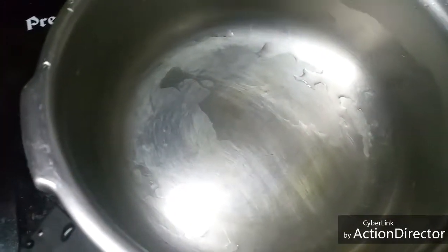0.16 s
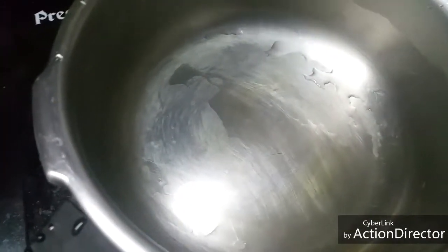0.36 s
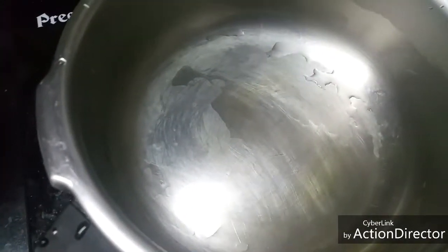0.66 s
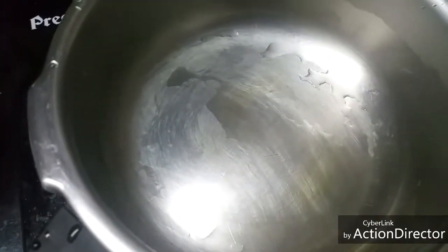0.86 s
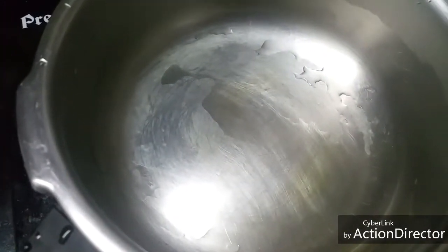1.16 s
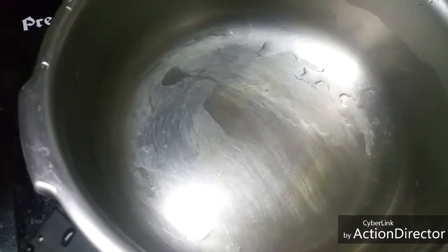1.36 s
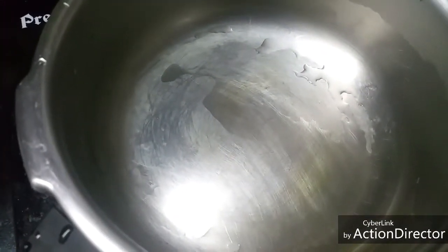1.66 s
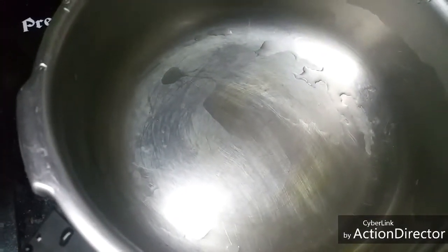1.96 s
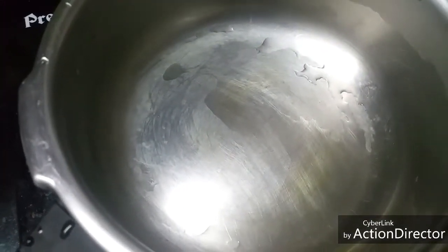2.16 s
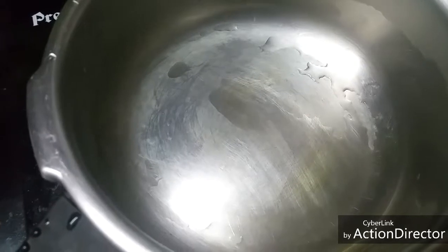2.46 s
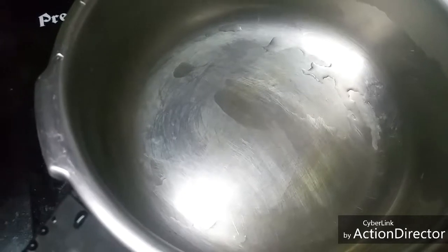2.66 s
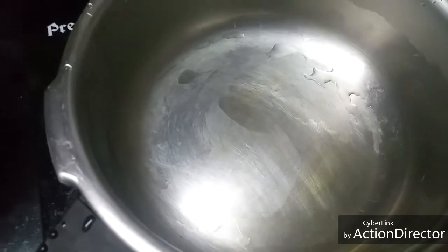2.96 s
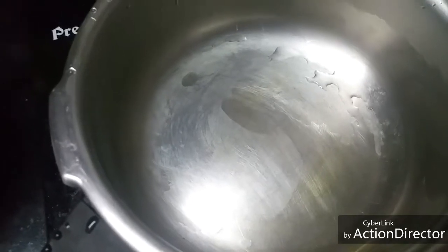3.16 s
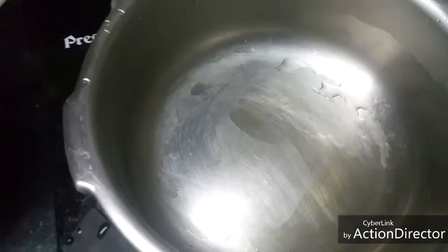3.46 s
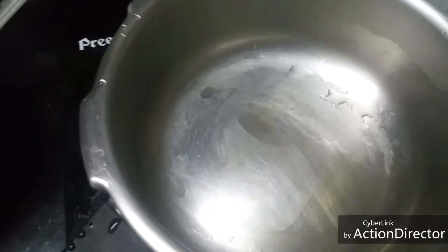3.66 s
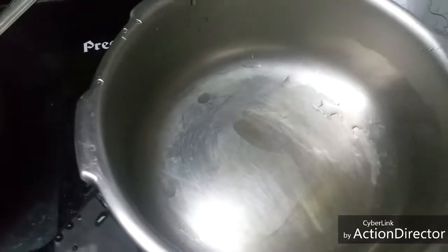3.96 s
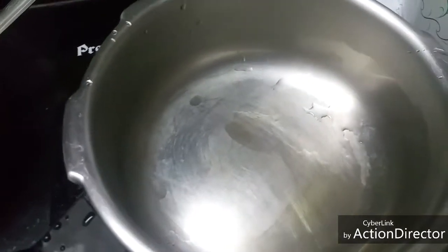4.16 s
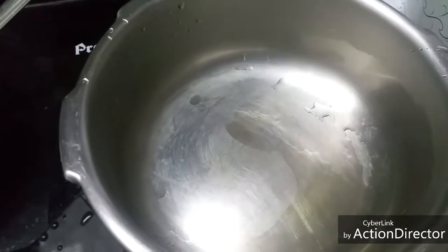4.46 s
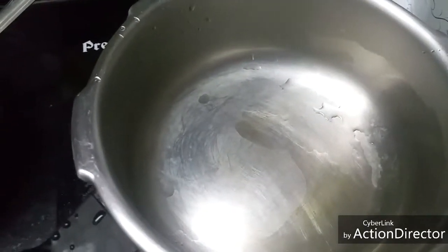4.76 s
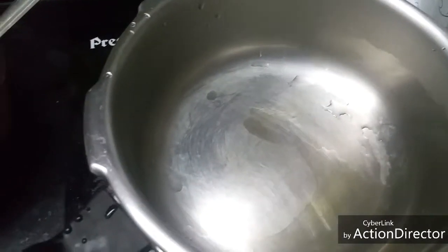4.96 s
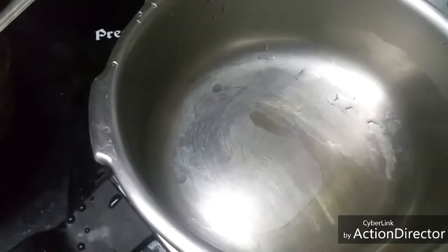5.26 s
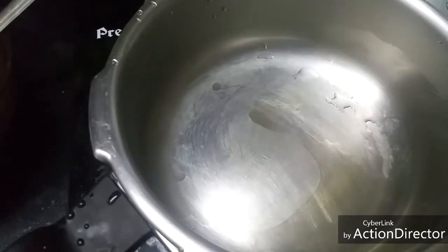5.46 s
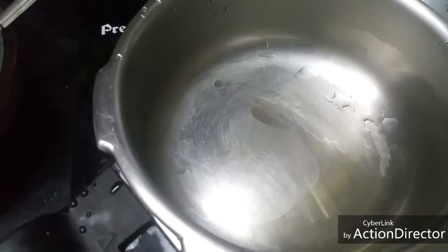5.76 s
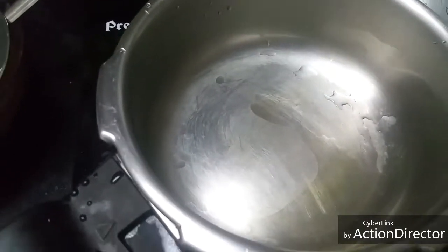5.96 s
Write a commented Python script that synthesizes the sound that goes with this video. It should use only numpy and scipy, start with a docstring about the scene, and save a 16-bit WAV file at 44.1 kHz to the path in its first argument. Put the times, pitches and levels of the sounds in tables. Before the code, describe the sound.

Close up in a small kitchen, an induction cooktop hums low while its cooling fan rushes and a wet steel pot base buzzes with thin, gliding high whines. A faint ting comes early, a softer clink with squeaky sliding around two seconds, then faint ticks. Near the end, bright steel clinks burst out with scraping, squeaks and a dull knock on the worktop.

```python
"""Steel pot on a humming induction cooktop

An induction cooktop heats a wet steel pot in a small kitchen.
Two sine tones make the coil hum: the lower swells and sinks, the upper stays nearly level.
Coloured noise and wavering tones make the cooling fan; mains-timed noise rings in the pot base
for a high buzz and gliding whines. Steelware is clinked, slid and made to squeak: dying tones
and noise, and short fluttering tones. Soft low bumps, faint ticks and two late knocks come too."""
import sys
import numpy as np
from scipy import signal
from scipy.fft import rfft, irfft, next_fast_len
from scipy.io import wavfile

SR = 44100
rng = np.random.default_rng(int(sys.argv[2]) if len(sys.argv) > 2 else 0)


def dump(signal):
    """Clip the signal to [-1, 1] and save it as 16-bit WAV at the path in sys.argv[1]."""
    limited = np.clip(np.atleast_2d(signal).T, -1, 1)
    pcm = np.round(limited * 32767).astype(np.int16)
    wavfile.write(sys.argv[1], SR, pcm)


N = 269098
T = np.arange(N) / SR
RING_T = T[:SR // 2]  # the half second given to each short sound
SIZE = next_fast_len(N, True)
FREQS = np.maximum(np.arange(SIZE // 2 + 1) * SR / SIZE, 1)
MAINS_HZ = 49.955
CUTOFF_HZ = 15100

# Many weak, crowded modes of the steelware, as a spectrum shape: pitch_hz, level_db [dB per Hz]
CROWDED_MODES = [(500, -24), (1700, -18), (2300, 0), (2850, -7), (3150, -4), (3700, 2), (4200, -14),
                 (4850, -1), (5450, -18), (6150, 0), (6600, -6), (7650, 5), (8000, -2), (8450, 7),
                 (9150, -18), (11800, -2), (15000, -11)]


def from_db(db):
    """Turn decibels into a plain gain."""
    return 10 ** (np.asarray(db) / 20)


def rms_one(x):
    """Scale a sound to an rms (average strength) of 1."""
    return x / np.sqrt(np.mean(x ** 2) + 1e-20)


def in_time(rows):
    """Join the points of each column with straight lines, giving a value at every sample."""
    s, *columns = np.transpose(rows)
    return [np.interp(T, s, column) for column in columns]


def over_hz(points):
    """Join the points of a short spectrum on a log pitch scale, giving a value at every frequency."""
    hz, value = np.transpose(points)
    return np.interp(np.log(FREQS), np.log(hz), value)


def bell(hz, width):
    """Height of a resonance at every frequency: 1 on top, falling away on both sides."""
    return 1 / np.hypot(1, 2 * (FREQS - hz) / width)


def filtered(x, gain):
    """Filter a sound by giving each frequency its own gain."""
    return irfft(rfft(x, SIZE) * gain, SIZE)[..., :N]


def colour(x, gain):
    """Filter by a gain per frequency, then scale to rms 1."""
    return rms_one(filtered(x, gain))


def pan(db):
    """Left and right gains for a level difference; positive is louder on the left."""
    return from_db(np.array([[.5], [-.5]]) * db)


def drift(rate_hz):
    """Smooth random curve with spread 1, made by dulling noise above a slow rate."""
    return colour(rng.standard_normal(N), 1 / (1 + (FREQS / rate_hz) ** 2) ** 2)


def waver(t, rate_hz):
    """Random line with spread near 1 that heads for a new value at the given rate."""
    knots = np.arange(0, 1, 1 / rate_hz)
    return np.interp(t - t[0], knots, rng.standard_normal(len(knots)))


def dying_noise(spectrum, t60, ragged=False):
    """Dense stereo ring from rms 1, falling 60 dB in t60 seconds; a ragged one has peaks and gaps."""
    cluster_hz, cluster_db = 70, 4.5
    hz, db = np.transpose(spectrum)
    bins = np.maximum(np.fft.rfftfreq(len(RING_T), 1 / SR), 1)
    gain = from_db(np.interp(np.log(bins), np.log(hz), db))
    if ragged:
        # waver runs along frequency here, with a new value every cluster_hz
        gain = gain * from_db(cluster_db * waver(bins / SR, SR / cluster_hz))
    noise = rng.standard_normal((2, len(RING_T)))
    steady = rms_one(irfft(rfft(noise) * gain, len(RING_T)))
    return steady * from_db(-60 * RING_T / t60)


def clicks(rows):
    """One single-sample push for each start_s and level_db."""
    out = np.zeros(N)
    for s, db in rows:
        out[round(s * SR)] += from_db(db)
    return out


def excite(force, response):
    """Every push of a force sets off the body's ring, and the rings add up (convolution)."""
    return signal.fftconvolve(np.atleast_2d(force), response, axes=1)[:, :N]


def add(out, s, sound):
    """Mix a short sound in at a time in seconds."""
    start = round(s * SR)
    out[:, start:start + sound.shape[-1]] += sound[..., :N - start]


def hum():
    """The coil pulls on the pot twice per mains cycle; this tone swells and sinks, its octave hardly."""
    # Peak level of the lower hum tone: time_s, level_db
    low_points = [(0, -44), (.5, -38.5), (1.2, -43.5), (1.5, -42.5), (1.8, -42.5), (2.15, -44), (2.85, -54),
                  (3.2, -49), (3.75, -47.5), (3.95, -51), (4.22, -39.5), (4.55, -52), (4.8, -42.5),
                  (5, -50), (5.3, -50), (6.1, -51)]
    # Peak level of the upper hum tone: time_s, level_db
    high_points = [(0, -36.5), (3.5, -36), (4.5, -36.5), (5.4, -36.5), (6.1, -34.5)]
    (low,), (high,) = in_time(low_points), in_time(high_points)
    pull = 2 * np.pi * 2 * MAINS_HZ * T
    octave = np.sin(2 * pull + 2 * np.pi * rng.random())
    return from_db(low) * np.sin(pull) + from_db(high) * octave


def fan(waver_db, wander_rad):
    """Rushing air is noise lifted by resonances; the rotor and blades add unsteady tones."""
    air_db = -35
    # Rotor and blade tones: pitch_hz, level_db [peak, before the wavering]
    fan_tones = [(56.8, -52.5), (242.3, -51.5), (483.8, -45.5), (553, -70), (967.5, -56.5), (1174.5, -54.5),
                 (1208.5, -58.5)]
    # Spectrum shape of the rushing air: pitch_hz, level_db [dB per Hz]
    air_shape = [(15, -63), (25, -35), (39, -27), (93, -10.5), (170, -9), (204, -9.5), (267, -12.5),
                 (420, -9), (514, -11.5), (550, -9), (864, -15), (1210, -21.5), (1490, -24.5), (2790, -26),
                 (5500, -43.5), (7150, -106), (12100, -120)]
    # Resonances of the air duct and pot cavity: pitch_hz, width_hz [where half the lift is left], lift_db
    duct = [(430, 130, 4), (1262, 220, 8), (1747, 280, 4.5), (3100, 79, 2.5)]
    # How alike left and right are, with values below 0 taken as 0: pitch_hz, likeness [1 is identical]
    likeness = [(60, 0.022), (120, 1), (240, 0.85), (480, 1), (950, 0.38), (1890, -0.15), (3770, -0.95),
                (7520, -0.097), (15000, 0.09)]
    # Left-right balance of the air: pitch_hz, left_over_right_db
    air_balance = [(60, -3), (99, 0), (160, -5), (270, -3), (450, 1), (740, -1.0), (1220, -3), (2010, -5.5),
                   (3330, -6.5), (5500, -3.5), (9080, -10.0), (15000, -3.0)]

    lift = sum(db * bell(hz, width) ** 2 for hz, width, db in duct)
    gain = from_db(over_hz(air_shape) + lift) * pan(over_hz(air_balance))
    alike = np.clip(over_hz(likeness), 0, 1)
    mid, side = rng.standard_normal((2, N))
    shared = filtered(mid, gain * np.sqrt(1 + alike))
    opposed = filtered(side, gain * np.sqrt(1 - alike)) * [[1], [-1]]
    out = from_db(air_db) * rms_one(shared + opposed)
    for hz, db in fan_tones:
        level = from_db(db + waver_db * drift(17.0))
        out += level * np.sin(2 * np.pi * hz * T + wander_rad * drift(2.2))
    return out


def mains_locked(order):
    """Stereo buzz repeating at order times the mains rate, with equally strong overtones; rms 1."""
    size = 2048
    lines = np.arange(size // 2 + 1) * order * MAINS_HZ < CUTOFF_HZ
    cycles = irfft(lines * np.exp(2j * np.pi * rng.random((2, len(lines)))))
    place = T * order * MAINS_HZ % 1
    return rms_one(np.array([np.interp(place, np.arange(size) / size, cycle) for cycle in cycles]))


def chatter(uneven, loose, between):
    """The pot base chatters in mains-timed bursts; the half cycles differ and part is random."""
    # Bursts in one mains cycle: time_s [into the cycle], width_s [spread of the bell shape], level_db
    bursts = [(.0038, .00065, 0), (.0075, .0007, -3), (.0138, .00065, 0), (.0176, .0007, -3)]
    in_cycle = T % (1 / MAINS_HZ)
    drive = between  # the strength that remains between bursts
    for s, width, db in bursts:
        drive = drive + from_db(db) * np.exp(-.5 * ((in_cycle - s) / width) ** 2)
    regular = mains_locked(order=2) + uneven * mains_locked(order=1)
    return drive * (regular + loose * rng.standard_normal((2, N)))


def buzz(force, modes):
    """The chatter rings in resonances of fixed pitch; rms 1."""
    power = sum((from_db(db) * bell(hz, 2 * width) ** 2) ** 2 for hz, width, db in modes)
    return colour(force, np.sqrt(power))


def whine(force, modes, centre_hz):
    """The chatter rings in a group of resonances that glide together; rms 1."""
    # Shift the moving centre down to 0 Hz, filter there, and shift it back up
    turn = np.exp(2j * np.pi * np.cumsum(centre_hz) / SR)
    offsets = np.fft.fftfreq(SIZE, 1 / SR)
    power = sum((from_db(db) / (1 + ((offsets - hz) / width) ** 2)) ** 2 for hz, width, db in modes)
    ringing = np.fft.ifft(np.fft.fft(force / turn, SIZE) * np.sqrt(power))[:, :N]
    return rms_one((ringing * turn).real)


def flares():
    """Lift in dB that rises quickly, holds and dies away, throbbing once per mains cycle."""
    attack_s, release_s = .06, .47
    # Flares of the top whine: start_s, end_s [of the hold], lift_db, place [of the throb in the cycle, 0-1]
    flare_rows = [(-.1, .25, 10.5, 0.93), (4.247, 4.952, 5.5, 0.9), (5.497, 6.1, 11, 0.54)]
    total = 0
    for start, end, db, place in flare_rows:
        rise = np.clip((T - start) / attack_s, 0, 1)
        fall = np.exp(-np.maximum(T - end, 0) / release_s)
        throb = (.5 + .5 * np.cos(2 * np.pi * (MAINS_HZ * T - place))) ** 2
        total = total + db * rise * fall * throb
    return total


def pot(base_db, low_db, middle_db, top_db, hiss_db):
    """The base buzzes steadily; three whines glide as it heats, swell and sink, and the top one flares."""
    waver_db, waver_hz = .06, 11
    # Resonances of the pot base on the glass: pitch_hz, half_width_hz [at half height], level_db
    base_modes = [(2850, 350, -10), (5050, 300, -16), (6490, 50, -10), (6780, 220, -13), (7600, 200, -17),
                  (7950, 120, -16), (8550, 130, -11), (9400, 160, -9), (9850, 100, 2), (12750, 200, -17),
                  (13270, 130, -10), (13780, 120, -14)]
    # Low, middle and top whine, each a list of: offset_hz [from its centre], half_width_hz, level_db
    whine_modes = [
        [(-120, 75, 0), (120, 85, -1)],
        [(-300, 110, -9), (0, 115, 0), (300, 110, -10)],
        [(-300, 130, -9), (0, 100, 0), (330, 100, -9)],
    ]
    # Whine strengths before the settings above are added: time_s, low_db, middle_db, top_db
    strengths = [(0.0, -43.5, -41, -42), (.4, -45.5, -37, -49.5), (.8, -43, -45, -49.5),
                 (1.2, -50, -37.5, -53), (1.55, -52, -48.5, -50), (2.1, -48.5, -42, -52),
                 (3.1, -55, -45, -52), (3.55, -50, -45.5, -50), (3.95, -50, -42, -54), (4.2, -49, -50, -49),
                 (4.95, -44.5, -40.5, -45.5), (5.25, -46, -47, -56), (5.7, -40, -43, -50),
                 (6.1, -44, -45, -45.5)]
    # Whine centres: time_s, low_hz, middle_hz, top_hz
    glide = [(0, 10570, 11200, 11940), (.55, 10570, 11130, 11930), (1.25, 10560, 10760, 11900),
             (2.6, 10570, 10760, 11880), (3.3, 10580, 11000, 11840), (3.7, 10620, 10850, 11820),
             (4.0, 10620, 10740, 11800), (4.3, 10600, 10950, 11790), (4.75, 10690, 11270, 11790),
             (5.7, 10760, 11270, 11810), (6.1, 10760, 11290, 11830)]

    low, middle, top = (level + waver_db * drift(waver_hz) for level in in_time(strengths))
    low_hz, middle_hz, top_hz = in_time(glide)
    steady = buzz(chatter(uneven=.5, loose=1.3, between=.6), base_modes)
    low_whine = whine(chatter(uneven=.7, loose=1.4, between=.2), whine_modes[0], low_hz)
    middle_whine = whine(chatter(uneven=.7, loose=1.4, between=.2), whine_modes[1], middle_hz)
    top_whine = whine(chatter(uneven=.7, loose=1.4, between=.5), whine_modes[2], top_hz)
    out = from_db(base_db) * steady * pan(-5.5)
    out += from_db(low + low_db) * low_whine * pan(-10)
    out += from_db(middle + middle_db) * middle_whine * pan(-8)
    out += from_db(top + flares() + top_db) * top_whine * pan(1)
    hiss_shape = 1 / np.hypot(1, (FREQS / 13700) ** 40)  # even up to 13.7 kHz, then a steep fall
    return out + from_db(hiss_db) * colour(rng.standard_normal((2, N)), hiss_shape)


def steel_modes(favoured, ring):
    """Steel rings in many modes: the place of contact favours some and a firm grip shortens them."""
    waver_hz, waver_db, waver_rad = 55, 2.5, .55
    settle_s = .025  # the level waver grows in over this time
    alike_below_hz = 2800  # higher modes reach the two sides out of step
    # Modes of the steelware: pitch_hz, level_db, t60_s [time to fall 60 dB, before the ring share]
    modes = [(2195, -28, .2), (2262, -20.5, .72), (2364, -19, .35), (2450, -28, .2), (2550, -26, .25),
             (2665, -21, .3), (2697, -28, .45), (3090, -28, .4), (3119, -25, .45), (3140, -29, .4),
             (3385, -24, .2), (3440, -21, .55), (3477, -23, .25), (3666, -9, .28), (3736, -20, .2),
             (4045, -30, .25), (4350, -29, .2), (4544, -29, .35), (4750, -19, .2), (4800, -21, .2),
             (4855, -15, .14), (4930, -20, .2), (5626, -27, .35), (6078, -23, .25), (6125, -16, .24),
             (6540, -24, .22), (6630, -24, .25), (7080, -23, .2), (7240, -23, .25), (7538, -14, .2),
             (7592, -10, .2), (7681, -11, .18), (7860, -17, .2), (8304, -3.5, .2), (8336, -10, .24),
             (8411, -9, .18), (8520, -13, .18), (8600, -14, .22), (9550, -23, .2), (9760, -22, .2),
             (10690, -19, .2), (11500, -14, .22), (12250, -18, .22), (12739, -12, .26), (13500, -21, .2)]
    t, out = RING_T, 0
    for hz, db, t60 in modes:
        lift = sum(lift_db / (1 + ((hz - near_hz) / 55) ** 2) for near_hz, lift_db in favoured)
        apart = (hz > alike_below_hz) * rng.uniform(.12, .42) * rng.choice([-1, 1])  # in turns
        turns = rng.random() + apart * np.array([[0], [1]])
        unsteady_db = waver_db * np.minimum(t / settle_s, 1) * waver(t, waver_hz)
        level = from_db(db + lift - 60 * t / (ring * t60) + unsteady_db)
        out = out + level * np.sin(2 * np.pi * (hz * t + turns) + waver_rad * waver(t, waver_hz))
    return out


def clinks(modes_db, crowd_db, crack_db):
    """Each blow is a short crack, clear modes and a dense ring; softer contacts lose the highs."""
    # Blows on the steel: start_s, level_db, contact_cutoff_hz, ring_share [of each mode's t60],
    # then two favoured modes: first_hz, first_lift_db, second_hz, second_lift_db
    blows = [(.1755, -26.5, 3600, 1.2, 2262, 11.8, 2665, 6), (2.049, -21.5, 1500, 1.4, 2665, 14, 3666, 1),
             (5.3644, -11.5, 11000, .9, 3666, 2.5, 2262, -4), (5.3705, -27, 10900, .45, 3736, 8, 7592, 5),
             (5.506, -11, 1500, 0.41, 2550, 10, 2195, 12), (5.5275, -17.5, 9000, 0.34, 6125, 16, 3666, 0),
             (5.5407, -14.5, 9000, 0.23, 8304, 6.8, 3666, 1.5), (5.564, -24, 14000, .8, 8320, 11, 12739, 6)]
    out = np.zeros((2, N))
    for s, db, cut_hz, ring, *favoured in blows:
        crack = from_db(crack_db) * dying_noise(CROWDED_MODES, t60=.016)
        clear = from_db(modes_db) * steel_modes(np.reshape(favoured, (2, 2)), ring)
        dense = from_db(crowd_db) * dying_noise(CROWDED_MODES, t60=.24, ragged=True)
        softness = signal.butter(1, min(cut_hz, .45 * SR), fs=SR, output="sos")
        add(out, s, from_db(db) * signal.sosfilt(softness, crack + clear + dense))
    return out


def rubs(modes_db, crowd_db, rasp_db):
    """Sliding steel slips in tiny uneven jerks that rasp at the contact and keep the steel ringing."""
    slips_per_s, slip_spread_db = 1100, 4
    # Strokes: middle_s, half_length_s, level_db, favoured_hz, lift_db
    strokes = [(2.146, 0.075, -40.5, 3440, 5), (2.203, 0.029, -40.5, 7592, 6),
               (2.278, 0.041, -41.5, 3477, 12), (2.313, 0.05, -45, 3440, 9), (5.409, 0.026, -27, 2364, 14),
               (5.467, 0.049, -31, 3400, 14), (5.538, 0.043, -27.5, 3100, 19), (5.579, 0.039, -32, 3666, 2)]
    # Spectrum shape of the rasp: pitch_hz, level_db [dB per Hz]
    rasp_shape = [(1500, -19), (3200, -2), (4300, -49), (5000, 9), (5600, -33), (6800, -4), (8500, 8),
                  (9200, -4.5), (11800, 7), (15000, -2)]
    out, t = np.zeros((2, N)), RING_T - RING_T.mean()
    for s, half, db, favoured_hz, lift_db in strokes:
        # Fresh random partials for each stroke
        dense = from_db(crowd_db) * dying_noise(CROWDED_MODES, t60=.2, ragged=True)
        rasp = from_db(rasp_db) * dying_noise(rasp_shape, t60=.04, ragged=True)
        clear = from_db(modes_db) * steel_modes([(favoured_hz, lift_db)], ring=1.0)
        spread = slip_spread_db * np.clip(rng.standard_normal(len(t)), -2, 2)
        sizes = rng.choice([-1, 1], len(t)) * from_db(spread)
        slips = rms_one(sizes * (rng.random(len(t)) < slips_per_s / SR))
        stroke = from_db(db) * np.exp(-(t / half) ** 2)
        add(out, s + t[0], excite(slips * stroke, clear + dense + rasp))
    return out


def squeaks(apart_rad):
    """Stick and slip lock onto one mode: a short fluttering tone, out of step on the two sides."""
    flutter_hz, flutter_db, wander_rad = 130, 3, .7
    # Squeaks: middle_s, half_length_s, pitch_hz, level_db [rms at the middle, before flutter and balance]
    squeak_rows = [(2.159, .035, 3420, -45), (2.195, 0.024, 3130, -42), (2.205, 0.028, 6621, -40),
                   (2.212, .022, 7251, -40), (2.239, 0.016, 3120, -35), (2.27, .04, 12250, -45),
                   (2.28, 0.014, 3135, -35), (2.28, .02, 10444, -43), (2.285, .03, 8608, -38),
                   (2.29, .035, 11480, -42), (2.29, .04, 7257, -47), (2.319, 0.015, 3140, -41),
                   (2.38, 0.07, 3120, -47), (5.403, .012, 3150, -42), (5.474, 0.025, 3060, -33),
                   (5.54, .014, 3385, -35), (5.542, 0.048, 3110, -35), (5.598, 0.032, 3100, -34)]
    out, t = np.zeros((2, N)), RING_T - RING_T.mean()
    for s, half, hz, db in squeak_rows:
        level = from_db(db + flutter_db * waver(t, flutter_hz)) * np.exp(-(t / half) ** 2)
        phase = 2 * np.pi * hz * t + wander_rad * waver(t, flutter_hz)
        tone = np.sin(phase + apart_rad * np.array([[0], [1]]))
        add(out, s + t[0], np.sqrt(2) * level * tone)
    return out


def bumps():
    """Soft low bumps of dying noise, the same on both sides."""
    # Bumps: start_s, level_db
    bump_rows = [(2.3, -46), (2.8, -44), (3.02, -44)]
    # Spectrum shape of a bump: pitch_hz, level_db [dB per Hz]
    bump_shape = [(15, -22), (35, -11), (55, -1), (90, -10), (200, -59)]
    return excite(clicks(bump_rows), dying_noise(bump_shape, t60=.55))[0]


def ticks(snap_db, ring_db):
    """Tiny dry snaps of noise, each with a brief tail of mixed steel partials."""
    # Ticks: start_s, level_db [of the whole tick, before the snap setting], tail_db [added to the tail]
    tick_rows = [(3.1971, -43.5, -2.5), (3.8933, -48, 4), (4.7755, -51, 0), (4.8928, -45, 2),
                 (4.8973, -46, 7), (4.9144, -50, 5.5), (5.1881, -53, 6), (5.2814, -48, 5),
                 (5.2906, -38, -3)]
    # Spectrum shape of snap and tail noise: pitch_hz, level_db [dB per Hz]
    tick_shape = [(1000, -5), (3200, 0), (4200, 5), (5000, 6), (5700, 0), (8000, 13), (11000, -13),
                  (15000, 0)]
    out = np.zeros((2, N))
    ring = from_db(ring_db) * steel_modes([(3130, 19), (3700, 8), (12739, -12)], ring=.55)
    for s, db, tail_db in tick_rows:
        snap = from_db(snap_db) * dying_noise(tick_shape, t60=.008)
        tail = dying_noise(tick_shape, t60=.15, ragged=True) + ring
        add(out, s, from_db(db) * (snap + from_db(tail_db) * tail))
    return out


def knocks(modes_db, rattle_db):
    """Steelware settles on the worktop, which answers with a thud, hollow modes and a dull rattle."""
    # Knocks: start_s, level_db
    knock_rows = [(5.507, -28.5), (5.544, -35.5)]
    # Modes of the worktop: pitch_hz, level_db, t60_s [time to fall 60 dB]
    worktop_modes = [(157, 0, 0.3), (464.6, -5, 0.36), (659, -2, .28), (830, -15.5, .18), (964, -10, .22),
                     (1163, -13, 0.3)]
    # Spectrum shape of the rattle: pitch_hz, level_db [dB per Hz]
    rattle_shape = [(60, -24), (150, 14), (260, -38), (650, 23), (1050, 20), (1800, -7), (4000, -31)]
    body = 0
    for hz, db, t60 in worktop_modes:
        body = body + from_db(db - 60 * RING_T / t60) * np.sin(2 * np.pi * hz * RING_T)
    rattle = from_db(rattle_db) * dying_noise(rattle_shape, t60=.23)
    return excite(clicks(knock_rows), from_db(modes_db) * body + rattle)


def scene():
    """The cooktop runs throughout while the steelware is handled."""
    cooktop = hum() + fan(waver_db=1.5, wander_rad=.8)
    buzzing = pot(base_db=-46, low_db=-1.0, middle_db=-4.0, top_db=.5, hiss_db=-53.5)
    steel = clinks(modes_db=.5, crowd_db=-14.0, crack_db=-4.0)
    steel += rubs(modes_db=-29.5, crowd_db=-29.0, rasp_db=-20.5)
    steel += squeaks(apart_rad=2.29)
    # Left-right balance of the steel: pitch_hz, left_over_right_db
    balance = [(2400, -4.0), (3600, -3.0), (4900, 2.0), (6200, 3.0),
               (8300, -4.5), (11000, -7.0), (13500, 5)]
    steel = filtered(steel, pan(over_hz(balance)))
    small_sounds = bumps() + ticks(snap_db=9, ring_db=1)
    return cooktop + buzzing + steel + small_sounds + knocks(modes_db=0, rattle_db=0.0)


def record(dry):
    """A steep low-pass filter removes the very top."""
    return signal.sosfilt(signal.ellip(10, .2, 80, CUTOFF_HZ, fs=SR, output="sos"), dry)


dry = scene()
out = record(dry)
dump(out)
```